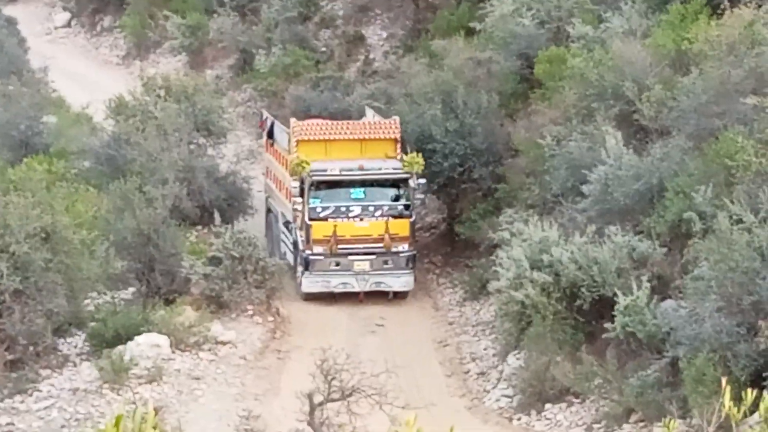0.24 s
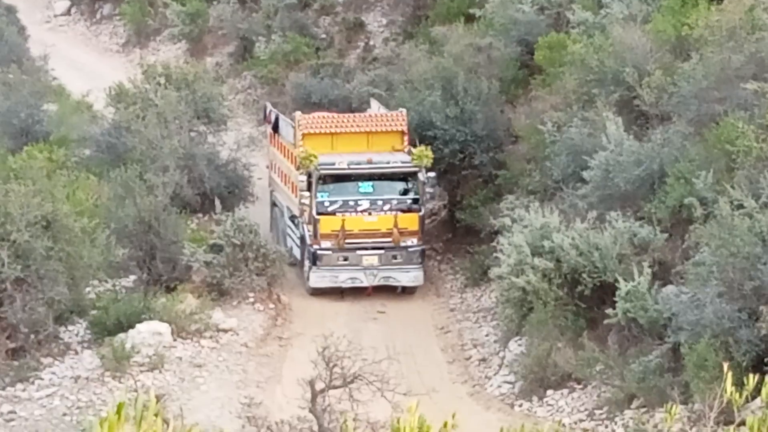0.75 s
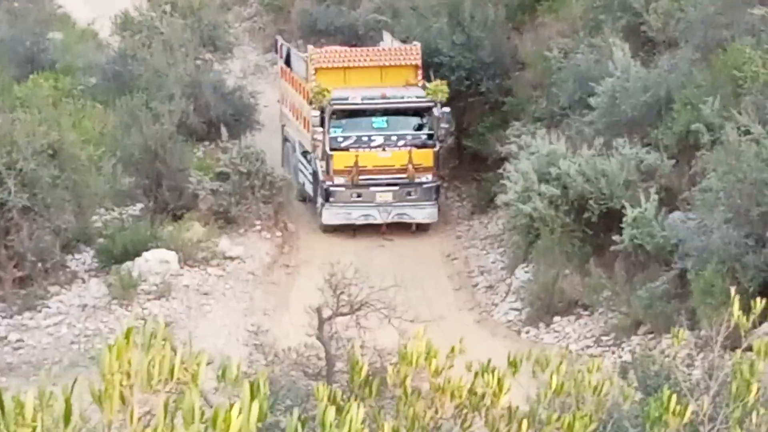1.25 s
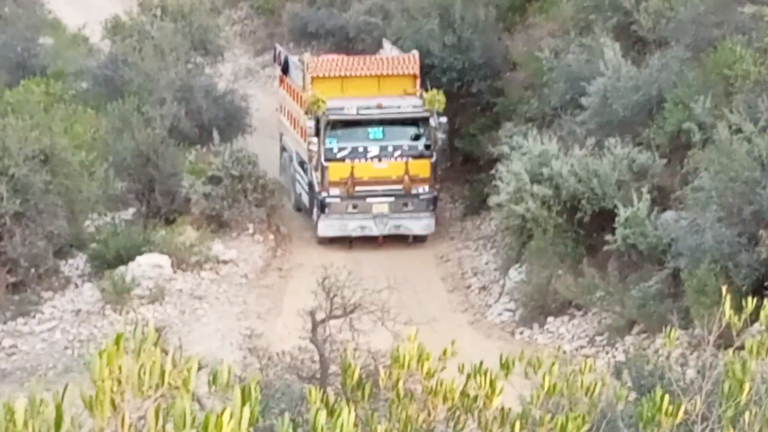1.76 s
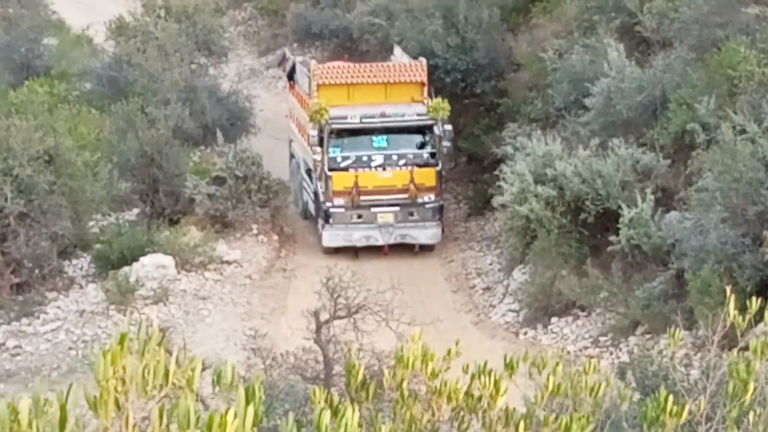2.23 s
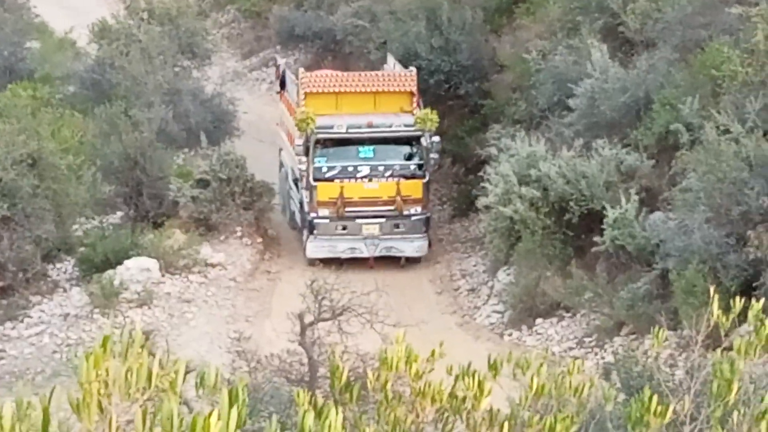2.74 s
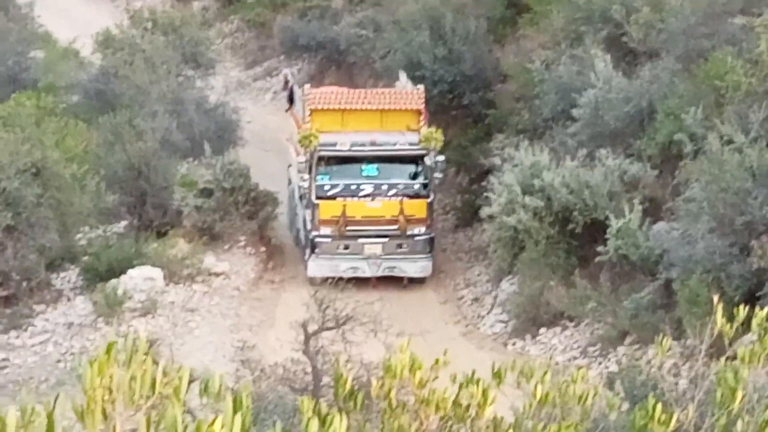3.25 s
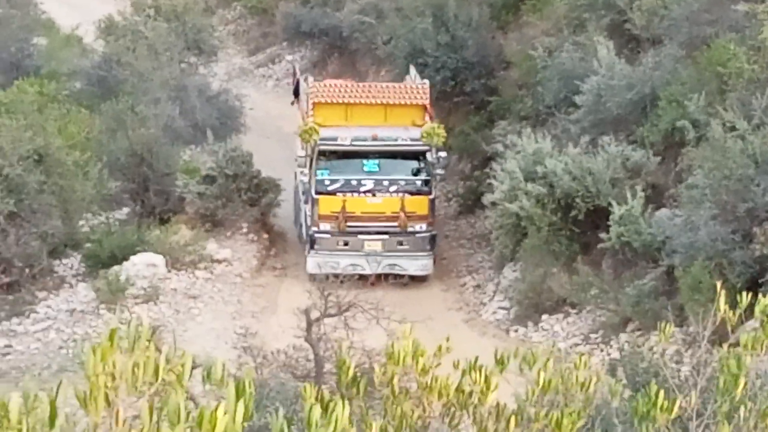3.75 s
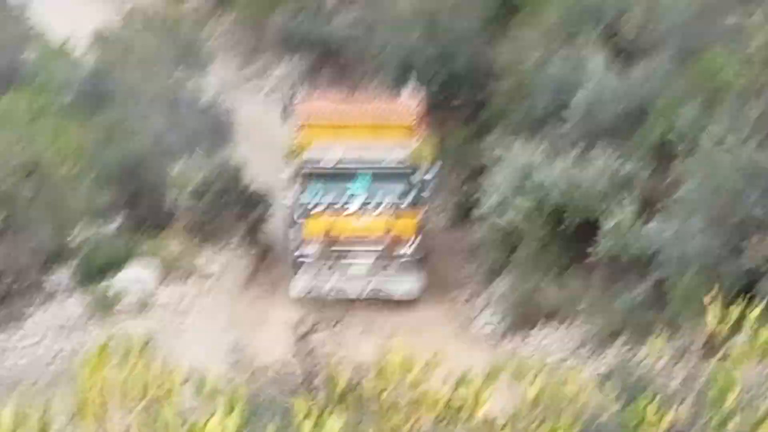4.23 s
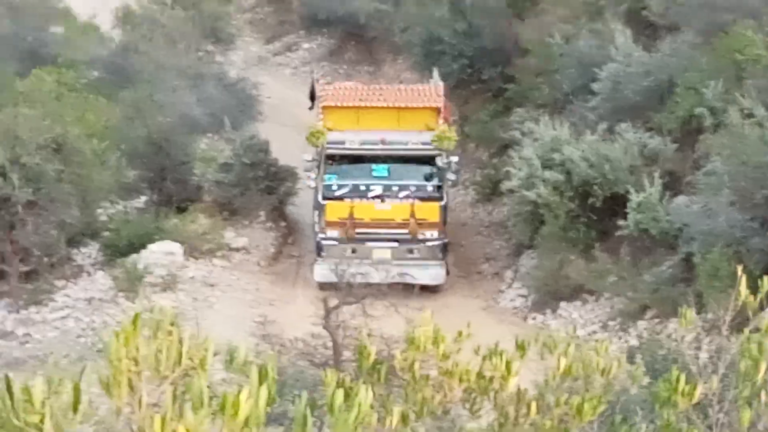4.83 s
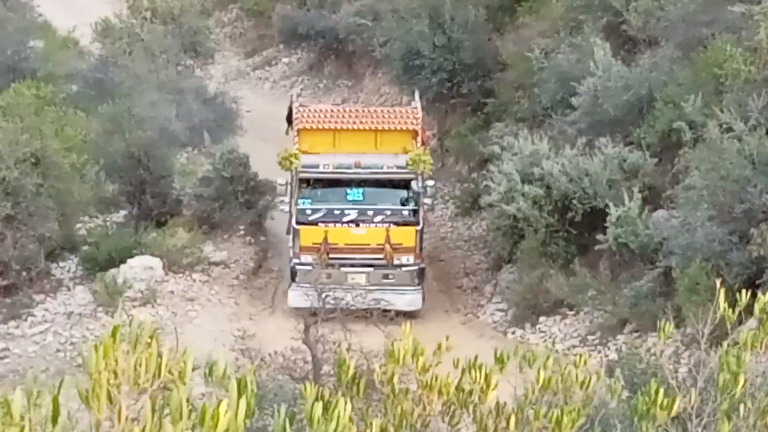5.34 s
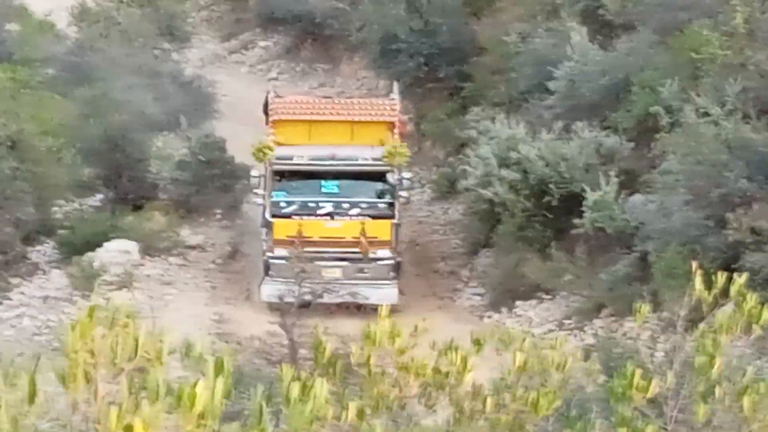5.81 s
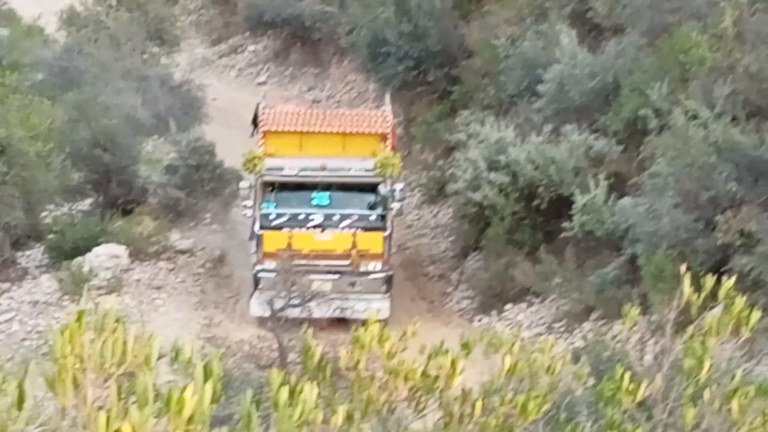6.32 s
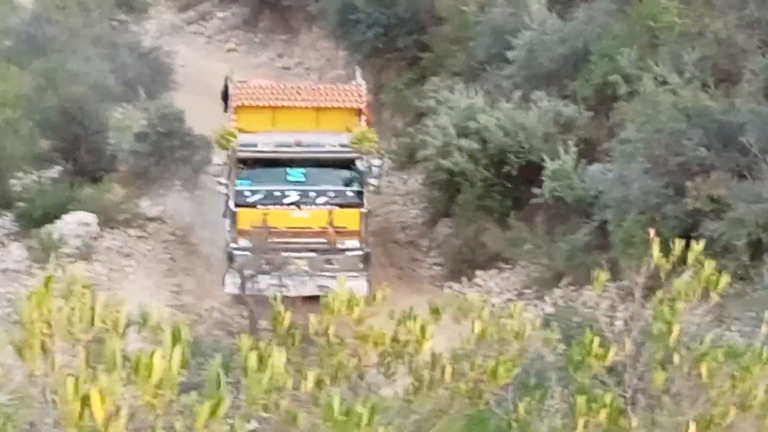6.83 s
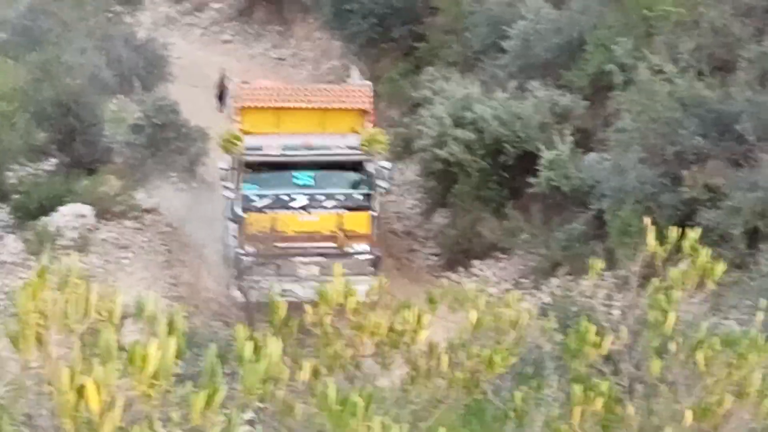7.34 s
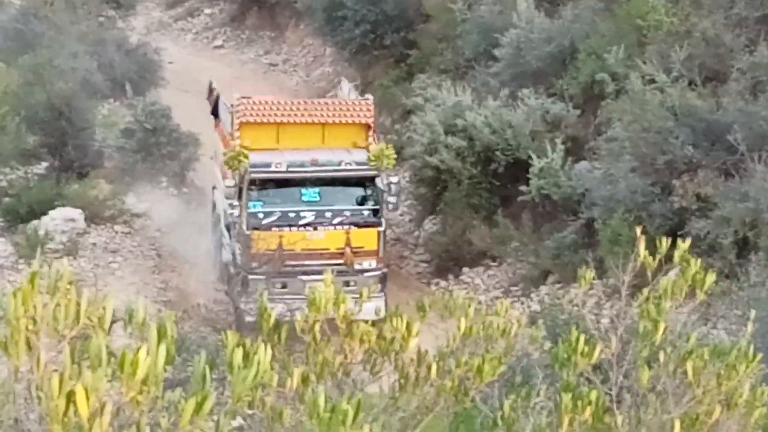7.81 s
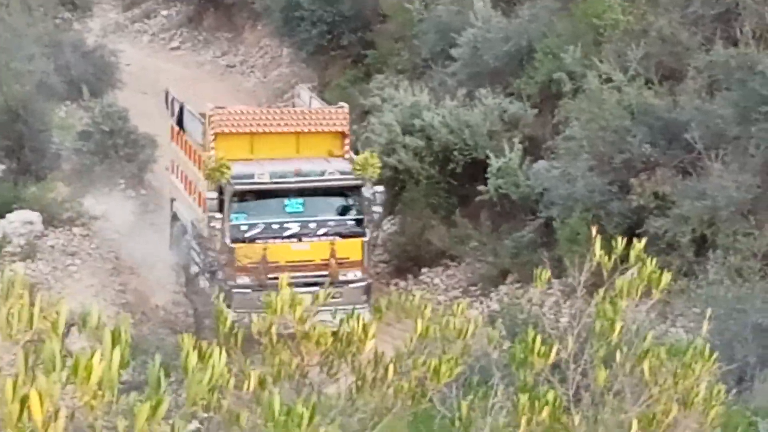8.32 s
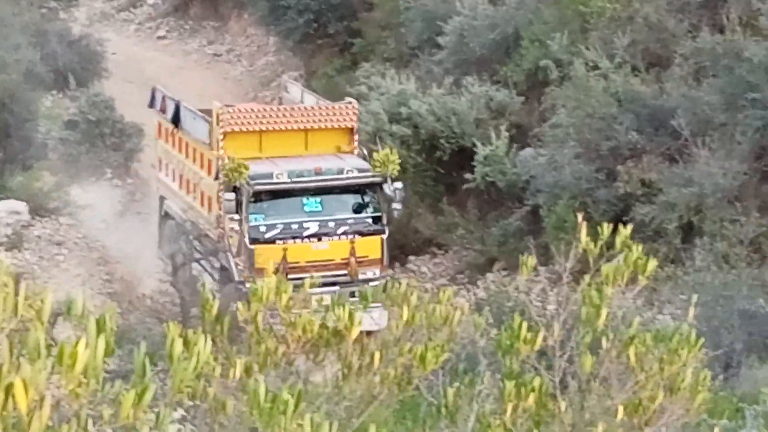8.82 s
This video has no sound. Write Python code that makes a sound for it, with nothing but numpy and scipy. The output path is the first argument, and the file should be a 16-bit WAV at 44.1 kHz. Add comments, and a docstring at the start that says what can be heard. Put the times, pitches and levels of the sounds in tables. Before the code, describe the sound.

A heavy diesel tipper truck runs throughout, slowly nearing on a dirt track among hillside bushes. Its engine has a low, loping rumble with a growling intake, lightly rattling steel and a steady hiss. The body drones a little more around 2, 5, 6 and 7.3 seconds. Small birds chirp and trill faintly all along, clearest near 1.7 and 3.9 seconds. At about 4.3 seconds a fingernail ticks on the handheld microphone, then fingers rub until 5.2 seconds, ending with a soft bump. The hand makes the truck sound slightly hollow and shifting. The revs creep up to a peak near 6.5 seconds and ease after 8. Several soft, low bumps hit the microphone between 7.5 and 8.8 seconds. At about 8.9 and 9.1 seconds the truck gives two short, loud, raspy toots of a two-tone horn, with a light hillside echo.

```python
"""Diesel tipper on a hillside track

A loping V8 climbs a dirt track, slowly nearing: firings drive the exhaust and ring the panels, the intake
growls, loose steel rattles. It ends with two toots of its two-tone diaphragm horn. Small birds whistle in the
bushes. The hand holding the microphone rubs and bumps it; a reflection off a nearby surface colours the truck's
treble."""
import sys
import numpy as np
from scipy import signal
from scipy.fft import rfft, irfft, next_fast_len
from scipy.io import wavfile
from scipy.ndimage import map_coordinates

SR = 44100
rng = np.random.default_rng(int(sys.argv[2]) if len(sys.argv) > 2 else 0)


def unload_audio(sound):
    """Save the sound as a 16-bit wav file, at the path given as the first command line argument."""
    columns = np.transpose(np.atleast_2d(sound))
    # keep every value between -1 and 1, then stretch to whole-number steps
    steps = np.round(np.clip(columns, -1, 1) * 32767)
    wavfile.write(sys.argv[1], SR, steps.astype(np.int16))


N = 399987

# engine speed: t/s, firing rate/Hz
FIRING_RATE = [(0, 58.2), (.24, 57.3), (0.52, 60.1), (0.92, 59.1), (1.35, 61.8), (2, 61.4), (2.65, 62),
               (3.3, 63.1), (5.4, 63.1), (6.55, 66.74), (7.4, 65.84), (8, 64.24), (8.3, 61), (8.65, 59.3)]
# exhaust lines, pipe drone: multiple of the eight-firing cycle, relative level/dB
EXHAUST_ORDERS = [(8, 1.5), (11, 1), (13, 2), (14, -2.5), (15, -9), (16, -7), (17, -5), (19, -15.5),
                  (30, -11), (32, -21)]
PIPE_ORDERS = [(40, -3), (48, -6), (56, -10.5), (64, -10)]
# truck spectra (hiss: before and after the grip closes): f/Hz, relative level/dB
RUMBLE_SPECTRUM = [(20, -42), (32, -22), (45, -4), (60, -6.5), (85, -3), (108, 2.5), (150, -6.5),
                   (220, -15.5), (400, -35), (900, -66)]
ROAR_SPECTRUM = [(90, -18), (180, -8), (290, -13), (390, -13), (470, -4), (570, -2), (820, -7),
                 (1100, -2.5), (1350, -9.5), (1550, -8), (1950, -12.5), (2250, -38), (3500, -42),
                 (8000, -72)]
HISS_OPEN_SPECTRUM = [(1240, -14), (2100, -2), (2460, -6), (2990, 0), (3380, 0), (4400, -11), (5500, -0.5),
                      (6380, -9.5), (6920, -6), (7830, -13), (9230, -29), (10300, -26.5), (11600, -34.5),
                      (15000, -30)]
HISS_HELD_SPECTRUM = [(1240, -44), (2100, -1), (3020, -1.5), (3250, -2.5), (3800, -7), (4660, -5),
                      (5640, -7.5), (6300, -5.5), (6750, -2), (7150, -8), (7500, -13.5), (9010, -27.5),
                      (12300, -35), (15000, -31)]
RATTLE_SPECTRUM = [(120, -40), (290, 2), (650, -4), (1300, -.5), (1900, -18.5), (2400, -37), (6000, -53)]
# block and cab modes: f/Hz, width/Hz, far gain/dB, near gain/dB
PANEL_MODES = [(1004, 85, -7.5, -6.5), (1321, 70, -5.5, -1.5), (2360, 110, -17.5, -25),
               (3250, 320, -50, -13)]
# intake growl: t/s, f/Hz, level/dB
INTAKE_GROWL = [(0, 634.2, -52), (2.2, 647, -49.5), (4, 640.9, -52), (5.9, 657.7, -50),
                (6.25, 669.2, -45.5), (7.4, 693.3, -43.5), (8.15, 698.4, -44), (8.8, 678.5, -43.5)]
# singing panel: t/s, level/dB
PANEL_LEVEL = [(0, -56.5), (2.2, -55), (4.5, -53), (5.1, -54), (5.35, -51), (6.0, -51.5), (6.4, -51.5),
               (7.6, -50.5), (7.9, -59), (8.8, -56)]
# ruts that set the tipper body droning: t/s, half length/s, lift/dB
TRACK_RUTS = [(2.1, 0.8, 6.5), (4.75, 0.5, 4), (6.2, 0.74, 7), (7.348, 0.42, 9.5)]
# horn diaphragms: harmonic, relative level/dB
LOW_HORN_HARMONICS = [(1, -1), (2, -9), (3, 1), (4, -1), (5, -3), (6, -15), (7, -3), (8, -2.5), (9, -5),
                      (10, -13), (11, -18), (12, -14), (13, -16), (14, -15), (15, -22), (16, -22),
                      (17, -10), (18, -13), (19, -19), (20, -29), (21, -29), (22, -32), (23, -42),
                      (24, -40)]
HIGH_HORN_HARMONICS = [(1, -1), (2, -4), (3, -3), (4, -.5), (5, -8), (6, -2), (7, -3), (8, -6), (9, -9),
                       (10, -8), (11, -16), (12, -13), (13, -14), (14, -13), (15, -23), (16, -27)]
# horn button: down t/s, up t/s
HORN_PRESSES = [(8.87, 8.987), (9.057, 9.2)]
# horn decay after release: f/Hz, time constant/s
HORN_DECAY = [(450, .014), (1500, .014), (3200, .021), (5000, .013)]
# horn rasp: f/Hz, relative level/dB
RASP_SPECTRUM = [(200, -30), (900, -1), (1300, 1), (1600, 8.5), (1900, -2), (2400, -6), (3150, 3),
                 (4500, -8), (7500, -11), (9000, -16), (11500, -28), (15000, -24)]
# reflection off a nearby surface: t/s, delay/ms, gain
SURFACE_REFLECTION = [(4.36, .3, 0), (4.45, .6, .7), (4.6, .95, .65), (4.75, 1.5, .5), (4.95, 1.78, .5),
                      (5.4, 1.7, .42), (6.25, 1.62, .4), (6.6, .95, .55), (6.9, .5, .45), (7.2, .43, .48),
                      (7.9, .445, .4), (8.3, .495, .5), (8.8, .4, .55)]
# fingers sliding on the case: start t/s, peak t/s, end t/s, level/dB
FINGER_STROKES = [(4.5, 4.87, 5.13, -37), (4.99, 5.05, 5.11, -47), (5.1, 5.16, 5.22, -51),
                  (5.58, 5.61, 5.63, -54)]
# finger and nail friction: f/Hz, relative level/dB
RUB_SPECTRUM = [(1180, -26), (2000, -5), (2180, -15), (2770, -5), (3120, -14.5), (4250, -7.5), (5000, -17),
                (6750, -3), (8880, -25.5), (15500, -21.5)]
NAIL_SPECTRUM = [(1500, -25), (4000, -12), (7000, 3), (9000, -1), (15500, -8)]
# bumps on the case: t/s, relative level/dB, f/Hz
CASE_BUMPS = [(5.123, -33, 132), (7.539, -33, 91), (7.635, -26, 78.5), (8.168, -32, 121), (8.352, -30, 80),
              (8.389, -20, 89), (8.451, -31.5, 92), (8.547, -33, 106), (8.824, -40, 106), (8.845, -37, 105)]
# arched bird notes: t/s, length/s, top f/Hz, level/dB
BIRD_CHIRPS = [(.072, .042, 4500, -55.5), (.158, .05, 4530, -56.5), (.21, .04, 2550, -53),
               (.242, .046, 4520, -54.5), (.965, .035, 2800, -52), (1.636, .028, 3100, -48),
               (1.832, .025, 2850, -50), (2.86, .054, 4880, -52.5), (5.86, .04, 6150, -56),
               (5.92, .05, 6050, -54.5), (6.005, .045, 5600, -56), (6.32, .04, 4580, -54),
               (6.53, .032, 4930, -52), (6.8, .07, 6170, -55), (7.459, .042, 3320, -48),
               (7.57, .05, 5250, -53)]
# falling bird notes: t/s, length/s, start f/Hz, level/dB, trill rate/Hz, trill depth/fraction of f
BIRD_FALLS = [(1.682, .1, 4520, -47, 108, .07), (1.938, .06, 3420, -48, 85, .03),
              (2.062, .025, 7800, -56, 0, 0), (2.916, .02, 5400, -52, 0, 0),
              (3.884, .17, 4420, -48, 49, .025), (6.84, .04, 8450, -59, 0, 0)]
# note shapes: pitch ratios (start, middle, end), skew (<1 peaks early)
ARCH, FALL = ((.85, 1, .93), 1), ((1, .88, .85), .45)
# hillside echo: f/Hz, T60/s
HILL_T60 = [(200, 0.26), (1500, 0.87), (4000, 0.51), (9000, 0.12)]

CRUISE_HZ, START_M, CLIMB_M_PER_S = 63, 102, 1
CLEARING_S = (6.8, 6.92)  # truck leaves the bushes
GRIP_S, CUPPED_S = 4.35, (4.44, 6.58)  # hand closes in; palm cupped


def truck():
    """Engine speed times the layers; effort and distance set levels; moving air makes them swell."""
    cycle_hz = curves(FIRING_RATE)[0] / 8
    cycle = np.cumsum(cycle_hz * (1 + .002046 * wobble(6))) / SR
    exhaust_db = truck_db(-55, db_per_hz=.11, clear_db=1.9)
    # the cupped hand shades roar and hiss
    roar_db = truck_db(-45, db_per_hz=.17, clear_db=1) - 2 * cupping()
    hiss_db = truck_db(-53.5, db_per_hz=.29, clear_db=0) - .9 * cupping()
    swell_db = .4 * wobble(9)
    engine = amp(roar_db - .68) * roar(cycle)
    engine += intake_growl(cycle) + singing_panel(cycle) + tipper_drone(cycle)
    engine += amp(roar_db - 9) * overtones(cycle)
    clatter = amp(roar_db - 6.3) * rattle(cycle)
    engine += amp(exhaust_db) * exhaust(cycle, cycle_hz)
    return amp(swell_db) * engine + clatter + amp(hiss_db + .5 * swell_db) * hiss(cycle)


def truck_db(base_db, db_per_hz, clear_db):
    """Layer level: follows distance and firing rate, shifts by clear_db out of the bushes."""
    nearing_db = -20 * np.log10(1 - CLIMB_M_PER_S * clock() / START_M)
    effort_db = db_per_hz * (curves(FIRING_RATE)[0] - CRUISE_HZ)
    return base_db + nearing_db + effort_db + clear_db * np.interp(clock(), CLEARING_S, [0, 1])


def exhaust(cycle, cycle_hz):
    """Uneven firing into two pipes: lines over a rumble, booming at the silencer's resonance."""
    strain = np.interp(8 * cycle_hz, [CRUISE_HZ - 1, CRUISE_HZ + 2], [.12, .9])  # effort roughens lines
    lines = np.zeros(N)
    for order, db in EXHAUST_ORDERS + PIPE_ORDERS:
        boom = 1 + 5.2 * abs(resonance(order * cycle_hz, hz=416, width_hz=13)) ** 2
        waver_rad = .35 * wobble(7) + strain * order / 48 * wobble(45)
        gain = amp(db + 2.94 * wobble(8.2)) * boom
        lines += gain * np.sin(2 * np.pi * (order * cycle + rng.random()) + waver_rad)
    return lines + amp(5) * coloured(rng.standard_normal(N), RUMBLE_SPECTRUM)


def roar(cycle):
    """Diesel knock and uneven noise puffs ring block and cab; the modes rebalance out of the bushes."""
    chug = 1 + .08 * np.cos(2 * np.pi * 4 * cycle) + .1 * np.cos(2 * np.pi * 3 * cycle)
    puffs = unit(chug * rng.standard_normal(N))
    knock = knocks(cycle, cylinder_db=2)
    drive = unit(puffs + .08 * knock + .25 * hillside(knock))
    nearness = np.interp(clock(), CLEARING_S, [0, 1])
    sound = filtered(drive, lambda f: amp(along(ROAR_SPECTRUM, f)))
    for hz, width_hz, far_db, near_db in PANEL_MODES:
        shake = unit(rng.standard_normal(N) + .61 * drive)
        mode_db = far_db + (near_db - far_db) * nearness + .34 * wobble(5)
        sound += amp(mode_db) * filtered(shake, lambda f: resonance(f, hz, width_hz) ** 2)
    return unit(sound) * lope(cycle, depth_db=2.3, peak_at=.13, sharpness=4) * amp(.5 * wobble(40))


def knocks(cycle, cylinder_db, scatter_db=3, jitter_s=.0003):
    """One impulse per firing; each of eight cylinders has its own strength and timing."""
    firings = np.flatnonzero(np.diff(np.floor(8 * cycle)))
    cylinder = np.arange(len(firings)) % 8
    own = rng.standard_normal((8, 2))[cylinder]
    chance = rng.standard_normal((len(firings), 2))
    offset_s = .000803 * own[:, 1] + jitter_s * chance[:, 1]
    at = np.clip(firings + SR * offset_s, 0, N - 1).astype(int)
    return unit(np.bincount(at, amp(cylinder_db * own[:, 0] + scatter_db * chance[:, 0]), N))


def lope(cycle, depth_db, peak_at, sharpness):
    """The strongest cylinders swell the sound once a cycle, at fraction peak_at."""
    return unit(amp(depth_db * np.abs(np.cos(np.pi * (cycle - peak_at))) ** sharpness))


def intake_growl(cycle, wander_hz=9):
    """Throbbing intake resonance, gliding higher along the climb."""
    growl_hz, growl_db = curves(INTAKE_GROWL)
    centre_hz = growl_hz.mean()
    glide = np.exp(2j * np.pi * np.cumsum(growl_hz - centre_hz + wander_hz * wobble(5)) / SR)
    ring = ringing(cycle, hz=centre_hz, width_hz=95, skirt=.34, flutter_db=-.9)
    growl = np.real(signal.hilbert(ring) * glide)
    return amp(growl_db) * growl * lope(cycle, depth_db=5.4, peak_at=.19, sharpness=9)


def singing_panel(cycle):
    """One narrow panel mode, pulsing with the lope."""
    ring = ringing(cycle, hz=1874, width_hz=62, skirt=.38, flutter_db=1.3)
    return amp(curves(PANEL_LEVEL)[0]) * ring * lope(cycle, depth_db=2.4, peak_at=.16, sharpness=2)


def tipper_drone(cycle):
    """Broad low mode of the tipper body, louder over ruts."""
    rut_db = sum(db * np.exp(-((clock() - at_s) / half_s) ** 2) for at_s, half_s, db in TRACK_RUTS)
    drone_db = truck_db(-55.5, db_per_hz=-.4, clear_db=-1.5) + rut_db
    return amp(drone_db) * ringing(cycle, hz=237.5, width_hz=191, skirt=0, flutter_db=2)


def ringing(cycle, hz, width_hz, skirt, flutter_db):
    """One mode with a broad skirt, shaken by firings and noise."""
    shake = hillside(knocks(cycle, cylinder_db=4.5)) + .75 * rng.standard_normal(N)
    mode = lambda f: resonance(f, hz, width_hz) ** 2 + skirt * resonance(f, hz, 5.5 * width_hz) ** 2
    return unit(filtered(shake, mode)) * amp(flutter_db * wobble(9))


def overtones(cycle):
    """High multiples of the firing rate, each wavering and fading on its own."""
    partials = np.zeros(N)
    for k in range(9, 23):
        fade = amp(5 * wobble(4))
        partials += fade * np.sin(2 * np.pi * (8 * k * cycle + rng.random()) + .5 * wobble(9))
    return unit(partials)


def rattle(cycle, per_s=110, spread_db=17, ring_s=.008):
    """Loose steel on the tipper body clanks at random, each part at its own pitch."""
    clanks, t = np.zeros(N + SR), np.arange(SR // 16) / SR
    for when, pitch, strength, phase in rng.random((int(per_s * N / SR), 4)):
        hz = 260 + 1700 * pitch
        envelope = amp(spread_db * strength) * np.exp(-t / ring_s)
        clanks[int(when * N):][:len(t)] += envelope * np.sin(2 * np.pi * (hz * t + phase))
    clatter = coloured(clanks[:N] + .5 * hillside(clanks), RATTLE_SPECTRUM)
    return clatter * lope(cycle, depth_db=2, peak_at=.15, sharpness=2)


def hiss(cycle):
    """Fan, intake and tyres on grit; the colour shifts with the grip on the microphone."""
    air = rng.standard_normal(N) * amp(.7 * wobble(25) + .2 * np.cos(2 * np.pi * 4 * cycle))
    held = ease(GRIP_S, .15)
    return (1 - held) * coloured(air, HISS_OPEN_SPECTRUM) + held * coloured(air, HISS_HELD_SPECTRUM)


def horn():
    """Two horns about a third apart on one button, with echo."""
    low = diaphragm(hz=422.8, harmonics=LOW_HORN_HARMONICS, jitter=.0058, rasp_db=-15.5)
    high = diaphragm(hz=520.5, harmonics=HIGH_HORN_HARMONICS, jitter=.0085, rasp_db=-13)
    both = amp(-15.6) * low + amp(-21.8) * high
    return both + amp(-19.5) * hillside(both)


def diaphragm(hz, harmonics, jitter, rasp_db):
    """One strike per cycle rings the horn's flare; a wider swing is brighter."""
    orders, levels_db = np.transpose(harmonics)
    # flare resonances set each harmonic's phase
    cepstrum = irfft(np.log(amp(np.interp(np.arange(129), orders, levels_db))))
    lag_rad = 2 * rfft(cepstrum[:128], 256).imag
    on = clock() > HORN_PRESSES[0][0]
    t = clock()[on]
    pitch_hz = hz * (1 + jitter * wobble(500) + .0014 * wobble(40))
    phase = 2 * np.pi * np.cumsum(pitch_hz[on]) / SR
    tone = np.zeros(N)
    for k, db in zip(orders, levels_db):
        # scattering on the way smears and flutters high harmonics most
        smear_rad = .09 * k * rng.standard_normal()
        flutter = amp(min(.25 * k, 1.6) * wobble(70)[on])
        envelope = swing(t, along(HORN_DECAY, k * hz)) ** (1 + .02 * k)
        tone[on] += amp(db) * flutter * envelope * np.cos(k * phase + lag_rad[round(k)] + smear_rad)
    tone /= np.linalg.norm(amp(levels_db)) * np.sqrt(.5)
    rasp = coloured(rng.standard_normal(N), RASP_SPECTRUM)
    # the contact chatters until the diaphragm settles
    chatter_db = sum(8 * np.exp(-np.abs(clock() - down_s) / .018) for down_s, _ in HORN_PRESSES)
    return tone + amp(rasp_db + chatter_db) * rasp * swing(clock(), along(HORN_DECAY, hz))


def swing(t, ring_s):
    """Diaphragm amplitude: builds with the button down, rings on after release."""
    return sum((1 - np.exp(-np.maximum(t - down_s, 0) / .01)) * np.exp(-np.maximum(t - up_s, 0) / ring_s)
               for down_s, up_s in HORN_PRESSES)


def past_surface(x, second_ms=.58, second_gain=.14):
    """A reflection off a nearby surface sweeps notches, duller on a longer path; a second, shorter one sounds
    hollow while the hand is cupped."""
    delay_ms, gain = curves(SURFACE_REFLECTION)
    treble = filtered(x, lambda f: f ** 2 / (f ** 2 + 1100 ** 2) / (1 + (f / 7500) ** 8))
    dull = filtered(x, lambda f: .85 * f ** 4 / (f ** 4 + 600 ** 4) / (1 + (f / 3200) ** 4))
    delayed = lambda sound, ms: np.interp(clock() - ms / 1000, clock(), sound)
    far = np.clip((delay_ms - .5) / .6, 0, 1)
    second = second_gain * cupping() * delayed(treble, second_ms)
    return x + gain * delayed(far * dull + (1 - far) * treble, delay_ms) + second


def cupping():
    """How far the hand cups the microphone, 0-1."""
    return ease(CUPPED_S[0], .18) - ease(CUPPED_S[1], .23)


def finger_rub():
    """Uneven friction of fingers sliding over the case."""
    pressure = sum(amp(db) * stroke(*times_s) for *times_s, db in FINGER_STROKES)
    return pressure * amp(2 * wobble(60)) * coloured(rng.standard_normal(N), RUB_SPECTRUM)


def fingernail(tick_s=4.35):
    """A nail scrapes, then ticks on the case."""
    pressure = stroke(tick_s - .07, tick_s - .004, tick_s + .002)
    scrape = amp(-46) * pressure * coloured(rng.standard_normal(N), NAIL_SPECTRUM)
    t = np.maximum(clock() - tick_s, 0)
    modes = np.sin(2 * np.pi * 3300 * t) - .4 * np.sin(2 * np.pi * 6700 * t)
    return scrape + amp(-18.5) * np.exp(-t / .0005) * modes


def stroke(start_s, peak_s, end_s, swell_db=27.5):
    """A finger lands, presses up to the peak, eases and lifts."""
    slack = np.interp(clock(), [start_s, peak_s, end_s], [1, 0, 1])
    return amp(-swell_db * slack) * (1 - slack ** 6)


def case_bumps():
    """Soft bumps rock the case for a few cycles."""
    bumps, t = np.zeros(N + SR), np.arange(SR // 4) / SR
    for at_s, db, hz in CASE_BUMPS:
        rock = t / .0046 * np.exp(1 - t / .0074) * np.sin(2 * np.pi * hz * t)
        overtone = 1.18 * np.exp(-t / .012) * np.sin(2 * np.pi * 1.91 * hz * t)
        bumps[round(at_s * SR):][:len(t)] += amp(db - 2.5) * (rock + overtone)
    return bumps[:N]


def birds():
    """Ragged whistles, arched or falling, with echo; trills flutter in pitch and level."""
    song = np.zeros(N + SR)
    notes = [(*row, 0, 0, ARCH) for row in BIRD_CHIRPS + far_chirps(per_s=14, db=-60)]
    notes += [(*row, FALL) for row in BIRD_FALLS]
    ragged = 1 + .012 * wobble(400)
    for start_s, length_s, pitch_hz, db, trill_hz, depth, (shape, skew) in notes:
        t = np.arange(int(length_s * SR)) / SR
        at = max(0, round(start_s * SR))
        progress, trill_rad = t / length_s, 2 * np.pi * trill_hz * t
        contour = np.polyval(np.polyfit([0, .5, 1], shape, 2), progress)
        hz = pitch_hz * contour * (1 - depth * np.sin(trill_rad)) * ragged[at:][:len(t)]
        envelope = np.sqrt(np.sin(np.pi * progress ** skew)) * (1 + np.cos(trill_rad)) / 2
        song[at:][:len(t)] += amp(db) * envelope * np.sin(2 * np.pi * np.cumsum(hz) / SR)
    return song[:N] + amp(-8) * hillside(song[:N])


def far_chirps(per_s, db):
    """Faint random notes from farther bushes; columns as BIRD_CHIRPS."""
    return [(when * (N / SR - .5), .0252 + .0326 * length, 2500 + 4500 * pitch ** 2, db - 5 * far)
            for when, length, pitch, far in rng.random((int(per_s * N / SR), 4))]


def hillside(x):
    """Diffuse echo from rocks and bushes; high treble dies first."""
    hz, t, spectra = signal.stft(rng.standard_normal(SR // 2), SR, nperseg=256)
    decay = amp(-60 * t / along(HILL_T60, hz)[:, None])
    tail = signal.istft(spectra * decay, SR, nperseg=256)[1]
    return signal.fftconvolve(x, tail / np.linalg.norm(tail))[:N]


def amp(db):
    """dB to gain."""
    return 10 ** (np.asarray(db) / 20)


def unit(x):
    """Scale to rms 1."""
    return x / np.sqrt(np.mean(x ** 2) + 1e-20)


def clock():
    """Sample times/s."""
    return np.arange(N) / SR


def ease(start_s, length_s):
    """Smooth step, 0 to 1."""
    return (1 - np.cos(np.pi * np.clip((clock() - start_s) / length_s, 0, 1))) / 2


def along(points, hz):
    """Read (f/Hz, value) points on a log axis."""
    f, values = np.transpose(points)
    return np.interp(np.log(hz + 1), np.log(f + 1), values)


def curves(rows):
    """Per-sample curve for each column after t/s."""
    times_s, *columns = np.transpose(rows)
    return [np.interp(clock(), times_s, column) for column in columns]


def wobble(knots_per_s):
    """Smooth random curve."""
    knots = rng.standard_normal(int(N * knots_per_s / SR) + 4)
    coarse = np.arange(0, N, 32)
    return np.interp(np.arange(N), coarse, map_coordinates(knots, [coarse * knots_per_s / SR]))


def filtered(x, response):
    """Apply response(f/Hz) to x."""
    size = next_fast_len(N + SR // 2)
    return irfft(rfft(x, size) * response(np.fft.rfftfreq(size, 1 / SR)), size)[:N]


def coloured(x, spectrum):
    """Shape x by (f/Hz, level/dB) points; rms 1."""
    return unit(filtered(x, lambda hz: amp(along(spectrum, hz))))


def resonance(f, hz, width_hz):
    """Response of one mode, 1 at its centre."""
    return 1j * f * width_hz / (hz * hz - f * f + 1j * f * width_hz)


def scene():
    """Truck, birds and horn on the hillside; handling noise up close."""
    return (past_surface(truck()) + birds() + horn() + finger_rub() + fingernail() + case_bumps())[None]


def record(dry):
    """Microphone: deep bass roll-off, hard upper band limit."""
    low_hz, top_hz = 32, 15600
    return filtered(dry[0], lambda hz: (hz < top_hz) * hz ** 4 / (hz ** 4 + low_hz ** 4))[None]


dry = scene()
out = record(dry)
unload_audio(out)
```